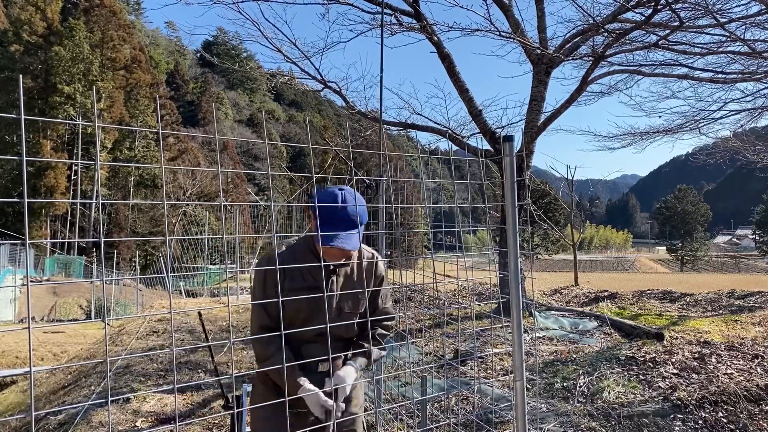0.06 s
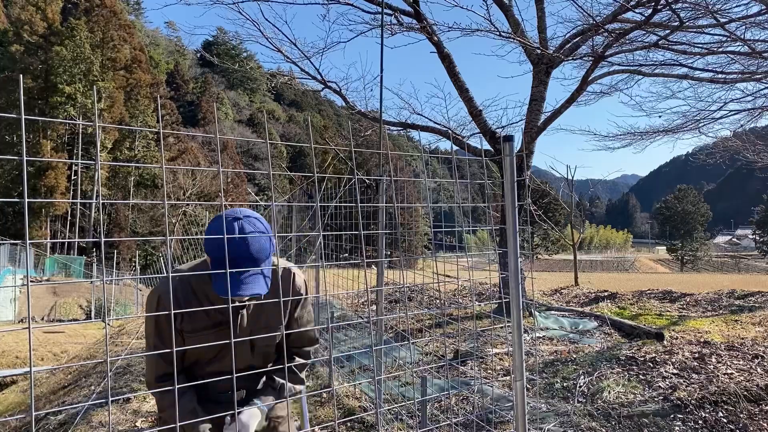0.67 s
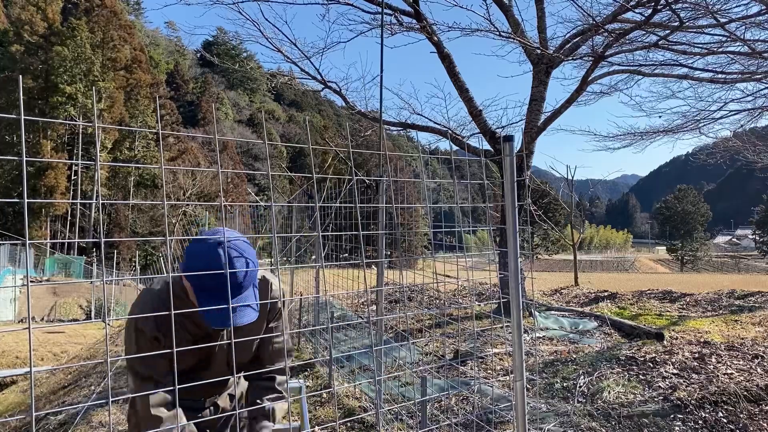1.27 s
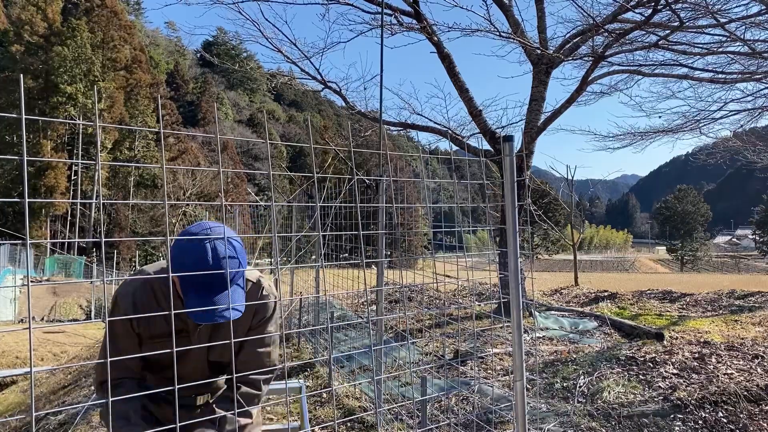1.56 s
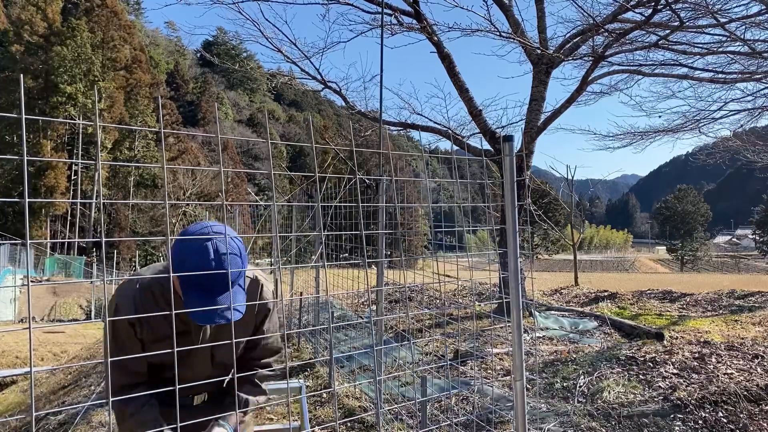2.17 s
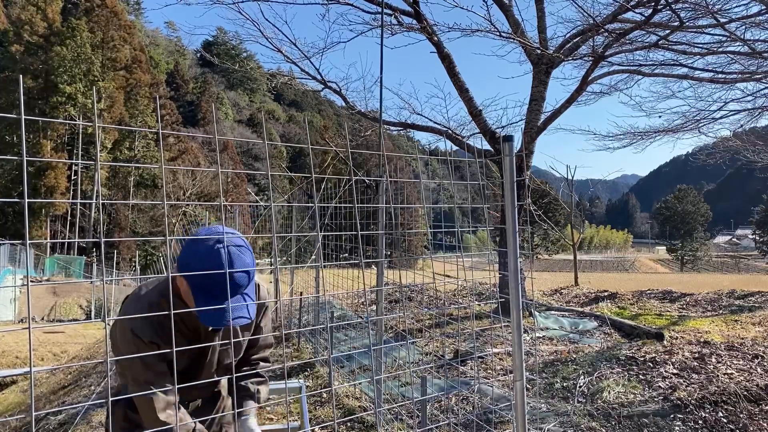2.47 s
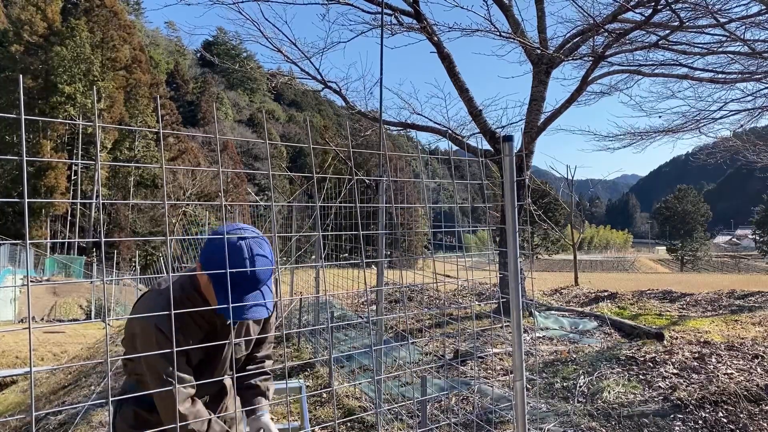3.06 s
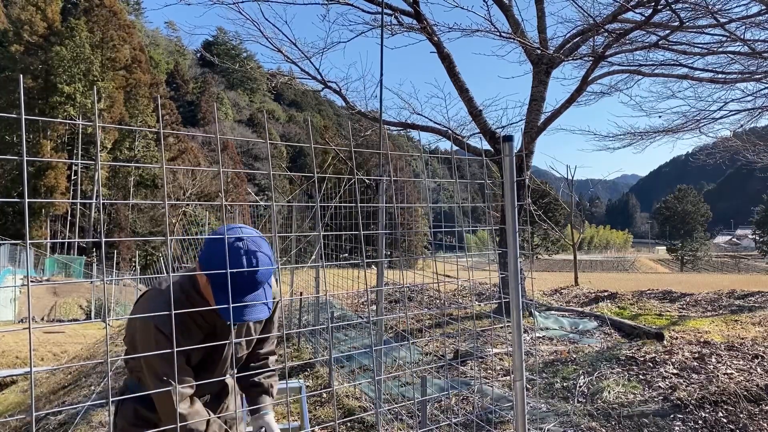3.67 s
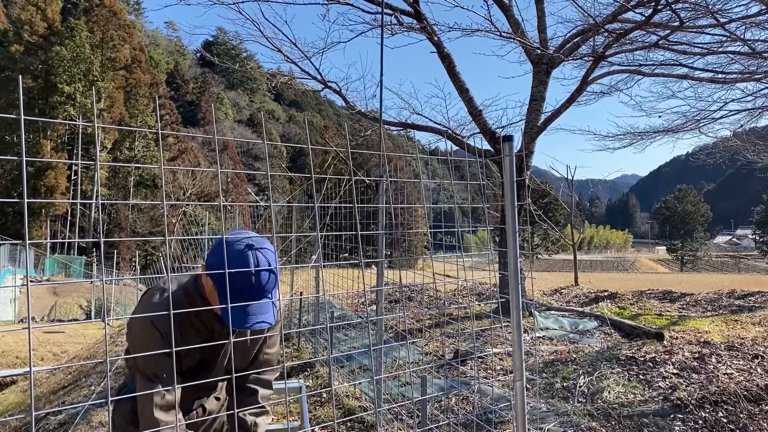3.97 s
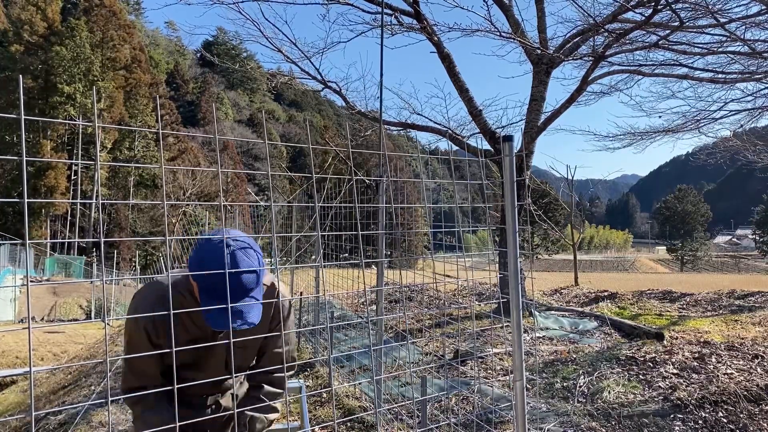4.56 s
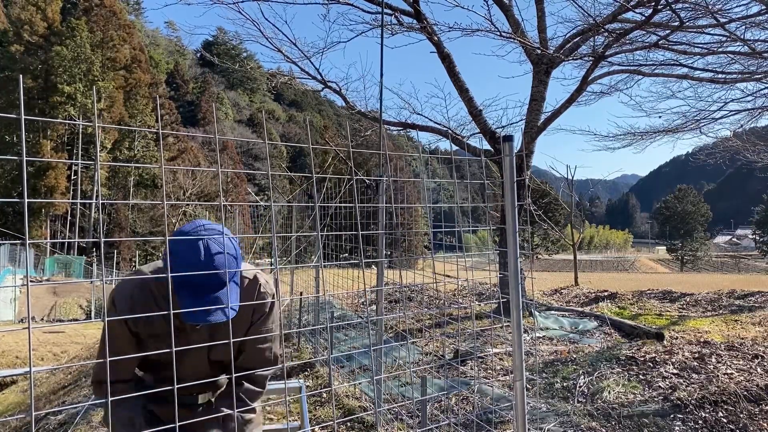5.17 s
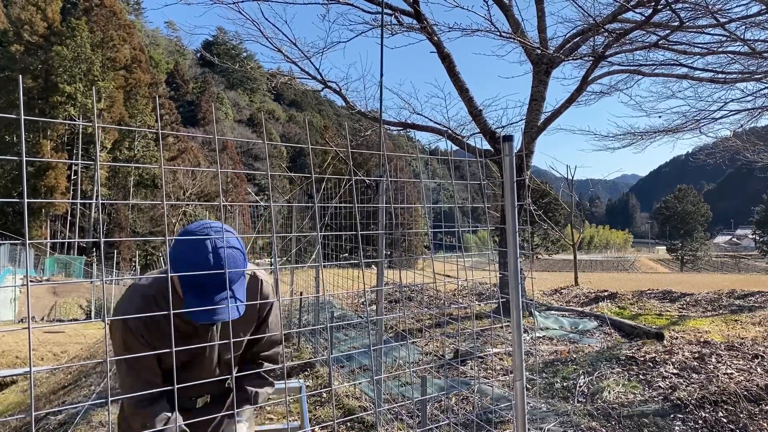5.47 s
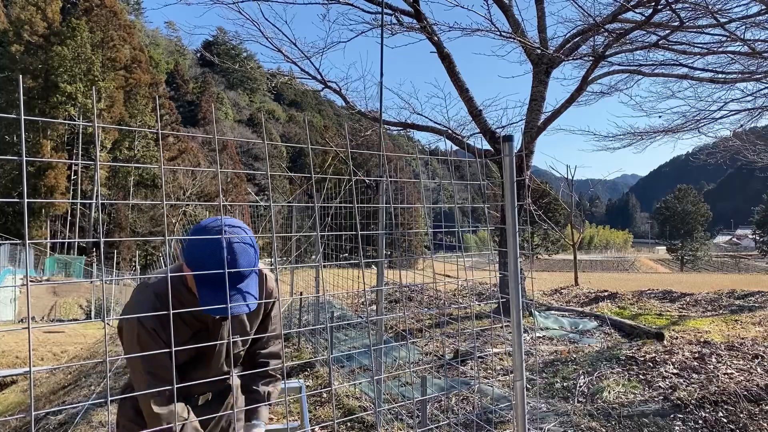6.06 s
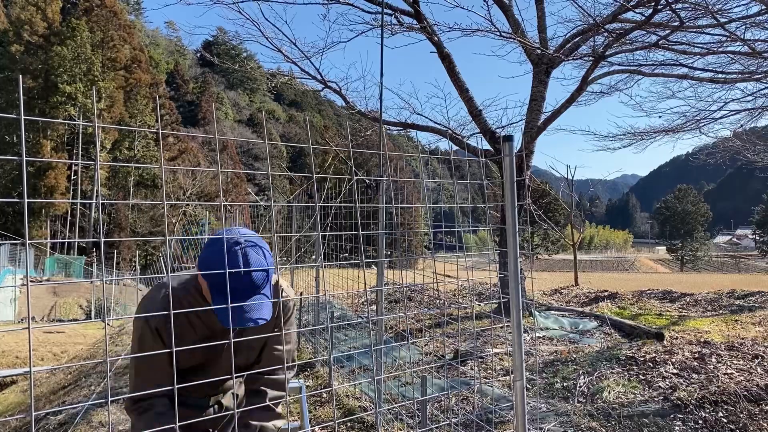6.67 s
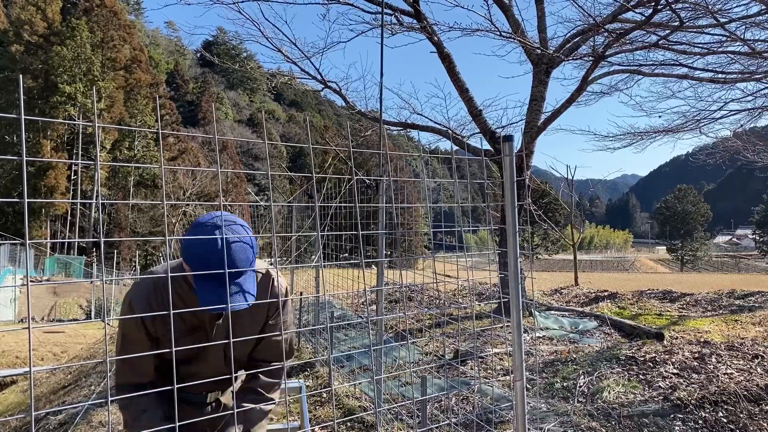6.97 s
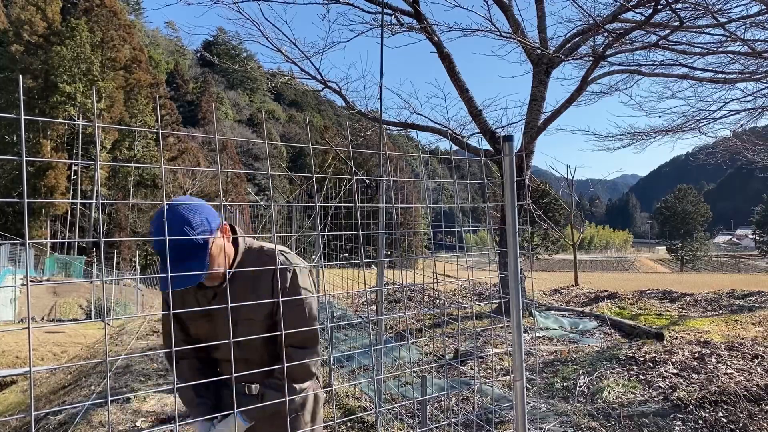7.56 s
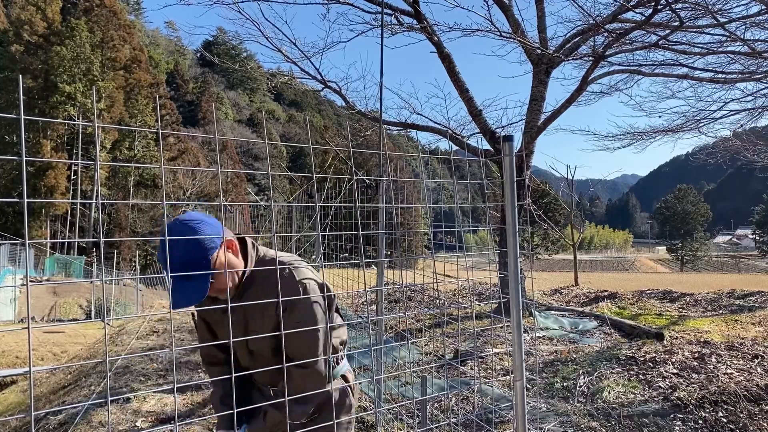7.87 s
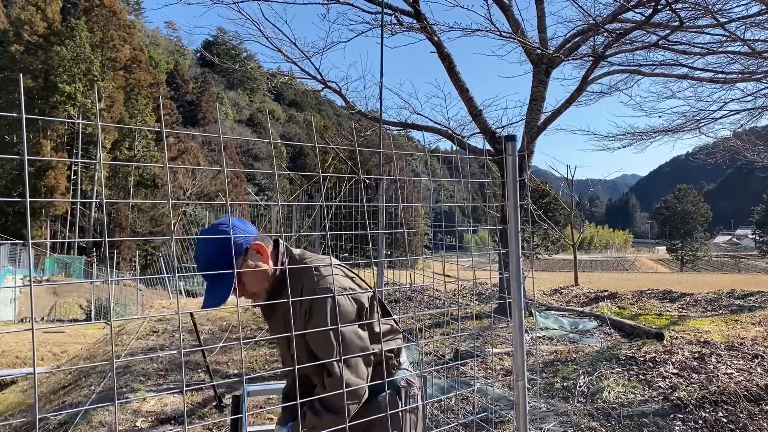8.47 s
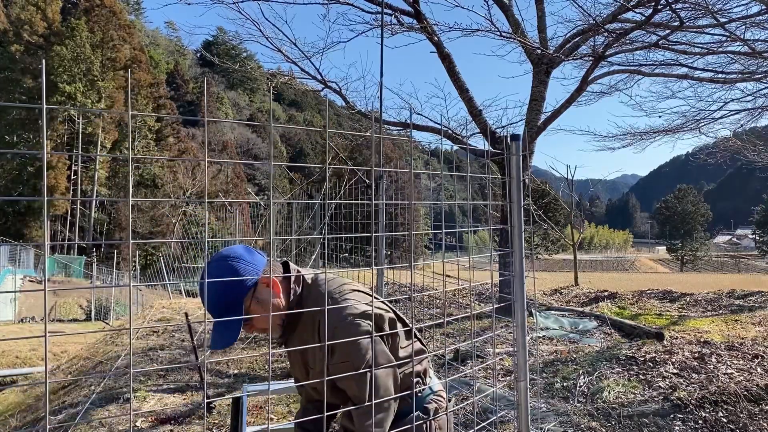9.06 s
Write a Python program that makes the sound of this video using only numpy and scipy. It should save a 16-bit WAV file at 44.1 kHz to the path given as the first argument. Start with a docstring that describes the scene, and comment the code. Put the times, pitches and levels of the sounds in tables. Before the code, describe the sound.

A quiet open valley, with light wind rumbling in small gusts on the microphone. During the first second, dry litter crackles and something rustles softly. Then a hammer strikes a steel stake eight times, close and loud, at about 1.3, 1.9, 2.7, 3.4, 4.0, 4.9, 5.8 and 6.8 seconds. Each blow is a sharp, slightly overloaded crack with a hollow knock and a high ping, followed by an echo from a slope. The wire fence rings faintly after each one and buzzes hardest at 1.3, 4.9 and 6.8 seconds. Between blows, wires tick lightly against a steel tube, with soft rubbing. From about 7.3 seconds the ticks grow busier, with a twig snap or two, then metal scrapes and clanks from 8 to 8.8 seconds, quieter than the hammering. The ringing fades away by about 9.3 seconds.

```python
"""Hammering a steel stake beside a wire fence

Each blow excites the stake's modes, leaves a high ping and overloads the microphones. Some blows
shake the mesh into a buzz, and a wooded slope across the open valley returns an echo. Between blows
the wires tick against a steel tube and dry litter crackles; at the end metal scrapes and clanks.
Light wind rumbles on the two microphone ports."""
import sys
import numpy as np
from scipy import signal
from scipy.fft import rfft, irfft, next_fast_len
from scipy.io import wavfile

SR = 44100
rng = np.random.default_rng(int(sys.argv[2]) if len(sys.argv) > 2 else 0)


def output_pcm(signal):
    """Save a mono or channel-first signal as 16-bit PCM at the path in sys.argv[1].

    Samples are clipped to [-1, 1] before scaling.
    """
    pcm = np.clip(np.atleast_2d(signal).T, -1, 1) * 32767
    wavfile.write(sys.argv[1], SR, np.round(pcm).astype(np.int16))


N = 410130
TIME = np.arange(N) / SR


def from_db(db):
    """Amplitude ratio of a level in decibels."""
    return 10 ** (np.asarray(db) / 20)


def unit_rms(x):
    """Normalisation to an rms of 1."""
    return x / np.sqrt(np.mean(x ** 2) + 1e-20)


def at_hz(points, hz):
    """Interpolation of a table on a logarithmic frequency axis."""
    frequencies, values = np.transpose(points)
    return np.interp(np.log(hz + 0.0013), np.log(frequencies), values)


def add(track, start_s, sound):
    """Superposition of a sound on a track from a given time."""
    i = max(round(start_s * SR), 0)
    track[..., i:i + sound.shape[-1]] += sound[..., :N - i]


def drift(per_s):
    """Random fluctuation of rms 1, linear between independent values."""
    return unit_rms(np.interp(TIME * per_s, np.arange(20000), rng.standard_normal(20000)))


def decay(t60, size=SR):
    """Exponential damping: 60 dB in t60 seconds."""
    return from_db(-60 * TIME[:size] / max(t60, 1e-4))


def band(x, low_hz, high_hz):
    """Butterworth band-pass with gentle skirts."""
    sos = signal.butter(2, [low_hz, min(high_hz, .45 * SR)], "band", fs=SR, output="sos")
    return signal.sosfilt(sos, x + 1e-18)


# Resonances of the fence wires: (frequency [Hz], bandwidth [Hz], gain [dB])
WIRE_RESONANCES = [(231, 26, 8), (818, 25, 6.5), (915, 70, 6.5), (1030, 70, 7), (2160, 40, 5),
                   (2940, 12, 6), (3560, 220, 4), (4300, 140, 3), (7100, 400, 4), (11050, 170, 6),
                   (12550, 15, 7)]
# Likeness of diffuse sound at the two ports: (frequency [Hz], coherence [1])
COHERENCE = [(50, 0.2), (250, 0.32), (700, 0.32), (1800, 0.033), (3500, 0.33), (5200, 0.052), (6700, .9),
             (7700, 0.24), (8500, 1), (9700, 0.97), (10500, 0.27), (11800, 0.84), (12900, 0.93),
             (14000, 0.63), (15500, 1)]


def noise(spectrum, wires=0, ripple_db=0, from_left=0, port_delay_s=.00026, direction_top_hz=6300):
    """A diffuse field plus a share that reaches the left port first; stereo, rms 1."""
    size = next_fast_len(N)
    hz = np.fft.rfftfreq(size, 1 / SR)
    peaks_db = sum(db / (1 + (2 * (hz - f) / width) ** 2) for f, width, db in WIRE_RESONANCES)
    ripple = np.interp(hz, np.linspace(0, SR / 2, 900), rng.standard_normal(900))   # many weak modes
    gain = from_db(at_hz(spectrum, hz) + wires * peaks_db + ripple_db * ripple)
    mid, side, far = rfft(rng.standard_normal((3, size))) * gain
    coherence = np.clip(at_hz(COHERENCE, hz), -1, 1)
    diffuse = np.sqrt(1 + coherence) * mid + np.sqrt(1 - coherence) * side * [[1], [-1]]
    lateral = np.array([far, far * np.exp(-2j * np.pi * hz * port_delay_s)])
    share = from_left * (hz < direction_top_hz)
    return unit_rms(irfft(np.sqrt(1 - share) * diffuse + np.sqrt(2 * share) * lateral)[:, :N])


def detuned(modes, spread):
    """A body hit on another spot: its modal frequencies shift a little."""
    return [(hz * (1 + spread * rng.normal()), db, t60) for hz, db, t60 in modes]


def struck(modes, spread_db, size=SR):
    """Free vibration: a sum of damped sinusoids, each of random strength and sign."""
    strengths = from_db(rng.normal(0, spread_db, len(modes))) * rng.choice([-1, 1], len(modes))
    return sum(strength * from_db(db) * decay(t60, size) * np.sin(2 * np.pi * hz * TIME[:size])
               for strength, (hz, db, t60) in zip(strengths, modes))


def driven(modes, force, spread_db):
    """Forced vibration: each mode is convolved with the force, at the energy of one clean blow."""
    out, size = 0, force.shape[1]
    for mode in modes:
        impulse_response = struck([mode], spread_db, size)
        response = signal.fftconvolve(force, impulse_response[None])[:, :size]
        out = out + unit_rms(response) * np.std(impulse_response)
    return out


# Hammer blows: (time [s], level [dB], relative ping [dB], relative knock [dB], bounce delay [s],
# relative bounce [dB], mesh shake [dB], lead of the graze [s])
BLOWS = [(1.2599, -10.5, -14.5, 6.5, .0055, -5, -10.5, 0.014),
         (1.8954, -8, -6.5, 6, 0.0062, 0.5, -23.5, 0.0016),
         (2.7191, -8.5, 1.5, 0, 0.0067, -7.5, -24.5, 0.003),
         (3.3754, -7, 1.5, -1.5, 0.0066, -2, -23.5, 0.00083),
         (4.0137, -6.5, -6.5, 2, .0075, -2.5, -22.5, .001), (4.891, -12, -8, 5.5, .009, -6, -10.5, 0.012),
         (5.839, -4.5, -3.5, 1, 0.0071, -2.5, -24, .001), (6.78, -6.5, -9.5, 0.5, 0.009, -4.5, -16, 0.0012)]
# Modes of stake and hammer, the hollow knock and the ping: (frequency [Hz], level [dB], T60 [s])
STAKE_MODES = [(705, -15, .018), (830, -20, .05), (1230, -7.5, .018), (1350, -11, .018), (1785, -1.5, .018),
               (1950, -6.5, .015), (2330, -6, .012), (2520, -3, .014), (2950, -13, .01),
               (3350, -10.5, .012), (4250, -14, .01), (4950, -14, .01), (6720, -1, .022), (7020, -3, .018),
               (7550, -4, .012), (7950, -2, .012), (8450, -3, .01), (8950, -7, .01), (11450, -7, .012),
               (14100, -8, .012)]
KNOCK_MODES = [(215, -20.5, .022), (273, -19.5, .02), (355, -13.5, 0.022), (445, -12, .018),
               (537, -17.5, 0.018)]
PING_MODES = [(6682, -4, .16), (6991, -9, .085), (6690, -25, .4), (12450, -26, .1)]


def hammer(contact_s=.0039, last_touch_db=-16, chatter_db=-24.5, crack_db=-5, fizz_db=-11.5):
    """Impact excitation: the head lands and bounces twice; each contact cracks and rings the steel."""
    out, size = np.zeros((2, N)), SR // 3
    pulse = np.exp(-(TIME[:size] / contact_s) ** 4)
    pan_db = np.array([[1], [-1]])
    for s, db, ping_db, knock_db, bounce_s, bounce_db, *_ in BLOWS:
        taps = np.zeros(size)
        landings = [0, round(bounce_s * SR), round(1.7 * bounce_s * SR)]
        taps[landings] = from_db([0, bounce_db, bounce_db + last_touch_db])
        contact = signal.fftconvolve(taps, pulse)[:size]
        grit = rng.standard_normal(size) + .42 * rng.standard_normal((2, size))   # centre plus width
        force = taps + from_db(chatter_db) * contact * grit
        knock = from_db(knock_db + pan_db) * driven(KNOCK_MODES, force, spread_db=1)
        body = from_db(6) * (driven(STAKE_MODES, force, spread_db=.5) + knock)
        ping = from_db(ping_db) * struck(detuned(PING_MODES, .002), .58, size)
        crack = from_db(crack_db) * band(grit * contact, 250, 16000)
        fizz = from_db(fizz_db) * band(grit * decay(.07, size), 5500, 21000)
        add(out, s, from_db(db) * (body + ping + crack + fizz))
    # the blows carry little below about 200 Hz
    return signal.sosfilt(signal.butter(4, 195, "high", fs=SR, output="sos"), out + 1e-18)


# Tugs on the mesh by hand: (time [s], level [dB], T60 [s])
TUGS = [(2.597, -42, 1), (3.232, -44.5, 0.66), (3.905, -47, 1), (6.218, -44.5, 0.99), (7.886, -36.5, 1),
        (8.597, -31, 0.27), (8.762, -40, 0.26)]
# Spectrum of the buzz: (frequency [Hz], spectral level [dB])
MESH_SPECTRUM = [(100, -12), (220, -6), (400, -9), (950, -0.5), (1400, -2.5), (2000, -0.5), (3400, -2.5),
                 (5800, -3), (7400, 1), (9000, -1.5), (12000, -3), (13400, -1), (14400, -7.5),
                 (15500, -18.5)]


def mesh(buzz_db=-7.5, shake_t60=.93, burst_t60=.17, jangle_db=-14, jangle_t60=1.9):
    """Contact rattle: wire crossings buzz together, hard at first; the lower modes jangle on."""
    shaking, jangling, size = np.zeros(N), np.zeros(N), 2 * SR
    shakes = [(s, shake_db, shake_t60) for s, *_, shake_db, lead_s in BLOWS]
    for s, db, t60 in shakes + list(TUGS):
        add(shaking, s, from_db(db) * (from_db(buzz_db) * decay(t60, size) + decay(burst_t60, size)))
        add(jangling, s, from_db(db + jangle_db) * decay(jangle_t60, size))
    buzz = noise(MESH_SPECTRUM, wires=.15, ripple_db=3.5, from_left=.51)
    roughness = from_db(.5 * drift(900) + .6 * drift(80))
    jangle = band(noise(SLOPE_SPECTRUM, wires=1, ripple_db=2.5, from_left=.65), 150, 4200)
    return buzz * roughness * shaking + jangle * jangling


def graze(rise_s=.0018):
    """Sliding contact: the head brushes the mesh just before it lands, in a thin bright rasp."""
    envelope = np.zeros(N)
    for s, *_, shake_db, lead_s in BLOWS:
        envelope += from_db(shake_db) * np.clip((TIME - s + lead_s) / rise_s, 0, 1) * (TIME < s)
    return band(noise(MESH_SPECTRUM), 2800, 15000) * envelope


# Notes of single wires: (frequency [Hz], level [dB], T60 [s])
WIRE_MODES = [(231, -56.5, 2.4), (818, -54, 2), (912, -56, 1.7), (1028, -56, 1.8), (1058, -54, 1.8),
              (1712, -59, 1.5), (2164, -56, 1.6), (2686, -60, 1.3), (2939, -51, 1.7), (3445, -58, 1.2),
              (3601, -54, 1.5), (3715, -57, 1.3), (3950, -60, 1.2), (4285, -59, 1.2)]


def singing_wires(sing_db=2, db_per_shake_db=.35, split=.0016, twin_db=-6):
    """Beats: after a blow each wire swings in two planes at slightly different frequencies."""
    out = np.zeros((2, N))
    mean_db = np.mean([shake_db for *_, shake_db, lead_s in BLOWS])
    twins = [(hz * (1 + split), db + twin_db, t60) for hz, db, t60 in WIRE_MODES]
    for s, *_, shake_db, lead_s in BLOWS:
        first_plane = struck(WIRE_MODES, 1.1, 2 * SR)
        second_plane = np.array([struck(twins, 1.7, 2 * SR) for port in range(2)])
        gain = from_db(sing_db + db_per_shake_db * (shake_db - mean_db))
        add(out, s, gain * (first_plane + second_plane))
    return out


# Swings of the mesh, about 0.2 s after a blow: (time [s], level [dB], level of second swing [dB])
REBOUNDS = [(1.4653, -8.5, -21.5), (2.0898, -18, -56), (2.9204, -16.5, -22.5), (3.5818, -17.5, -50),
            (4.2198, -13, -22.5), (5.084, -11, -21.5), (6.9897, -14.5, -27.5)]


def rebounds(second_swing_s=.1075, body_db=8, stray_loss_db=12.5, stray_body_db=-8):
    """Damped swinging: the mesh meets the tube twice, with two stray touches; rows as in TICKS."""
    touches = []
    for s, db, second_db in REBOUNDS:
        touches += [(s, db, body_db), (s + second_swing_s, second_db, body_db)]
        for late_s in rng.uniform(.0092, .29, 2):
            touches.append((s + late_s, db - stray_loss_db, stray_body_db))
    return touches


# Wires pushed against the tube: (time [s], level [dB], relative level of the tube's modes [dB])
TICKS = [(2.2822, -32, 15), (3.7389, -23.5, 9), (4.4054, -22.5, 12), (4.4917, -32, -3), (4.5541, -28, -14),
         (4.8357, -32.5, -13), (5.405, -24.5, -10), (5.5248, -34, 15), (5.6238, -23.5, 9), (5.972, -25, 2),
         (6.109, -28.5, -10), (6.2607, -24.5, 1), (6.33, -29.5, 10), (6.3904, -29.5, -11), (6.4872, -24, 5),
         (7.365, -26.5, 5), (7.4288, -26.5, 8.5), (7.5695, -30, 12), (7.708, -34.5, 13.5),
         (7.8156, -37, 14), (7.948, -26, 6), (7.977, -18, 4), (8.087, -16, 10), (8.1165, -26.5, 16),
         (8.1733, -21, 14), (8.2619, -17.5, 10.5), (8.36, -30.5, 14.5), (8.408, -33, 5), (8.44, -42, 11),
         (8.596, -14.5, 6), (8.625, -15.5, 10), (8.7216, -21.5, 11), (8.762, -11, 5)]
# Modes of the steel tube and wires: (frequency [Hz], level [dB], T60 [s])
TUBE_MODES = [(630, -27, 0.41), (1016, -29.5, 0.7), (1780, -14.5, 0.046), (1910, -17, 0.029),
              (2140, -12.5, 0.023), (2900, -29.5, 0.14), (3730, -22, 0.063), (6130, -14.5, 0.03),
              (6495, -14.5, 0.032), (7320, -15.5, 0.041), (12600, -20.5, 0.059), (14000, -7.5, 0.043)]
# Spectrum of clicks and rubbing: (frequency [Hz], spectral level [dB])
CONTACT_SPECTRUM = [(150, -10), (400, -1), (1000, -0.5), (2100, 0), (3000, -2.5), (5200, -5), (7200, -3.5),
                    (11000, -7), (13500, -8), (15500, -10)]


def ticks(click_db=-26.5, tail_db=-14.5, ring_db=-13.5, zing_db=-15.5):
    """Impact and dispersion: a wire clicks and rings the tube; a zing falls as slower waves arrive."""
    envelope, ringing, size = np.zeros(N), np.zeros(N), SR // 3
    zing_hz = 13250 + 2400 * np.exp(-TIME[:size] / .0035)
    zing = (decay(.03, size) + .2 * decay(.3, size)) * np.sin(2 * np.pi * np.cumsum(zing_hz) / SR)
    click = from_db(click_db) * decay(.022, size) + from_db(tail_db) * decay(.22, size)
    for s, db, body_db in list(TICKS) + rebounds():
        add(envelope, s, from_db(db) * click)
        touch_db = rng.normal(0, 2)   # every touch lands on another spot
        tube = from_db(ring_db + body_db) * struck(detuned(TUBE_MODES, .05), 3.4, size)
        add(ringing, s, from_db(db) * (tube + from_db(zing_db + touch_db) * zing))
    return noise(CONTACT_SPECTRUM, wires=.11, ripple_db=5) * envelope + ringing


# Knocks on a loose steel piece: (time [s], level [dB], relative level of the low modes [dB])
CLANKS = [(8.087, -53, 7), (8.262, -50, 9), (8.625, -41, 1), (8.762, -38.5, -3)]
# Modes of that piece: (frequency [Hz], level [dB], T60 [s])
LOOSE_STEEL_MODES = [(802, -15, .9), (1028, -6, .6), (1046, -12, .5), (2062, -11, .45), (2191, -14, .6),
                     (2934, -4, .35), (3709, -18, .2), (5593, 0, .45), (5607, -7, .35), (13330, -15, .35)]


def clanks(low_below_hz=3000):
    """Free vibration: a loose steel piece is left ringing in its inharmonic modes."""
    out = np.zeros(N)
    for s, db, low_db in CLANKS:
        modes = [(hz, mode_db + low_db * (hz < low_below_hz), t60)
                 for hz, mode_db, t60 in LOOSE_STEEL_MODES]
        add(out, s, from_db(db) * struck(modes, spread_db=.36))
    return out


# Spectrum of the echo, shared by the mesh's jangle: (frequency [Hz], spectral level [dB])
SLOPE_SPECTRUM = [(100, -32.5), (220, -8.5), (430, -1), (850, -0.5), (1400, -2.5), (2200, 0.5),
                  (4000, -2.5), (5200, -2.5), (7000, -0.5), (9500, -1), (13000, -14), (15500, -18)]
# Reverberation time of the slope: (frequency [Hz], T60 [s])
SLOPE_T60 = [(200, 2.6), (900, 1.95), (2500, 1.01), (7000, 0.6), (14000, 0.97)]


def slope_echo(echo_db=-31.5, delay_s=.15, near_db=-19.5, rise_s=.0063, flutter_db=3):
    """Scattering: near ground answers first, then the wooded slope on the left; bass lasts longest."""
    out, age = np.zeros((2, N)), TIME[:2 * SR]
    scatter = noise(SLOPE_SPECTRUM, wires=.8, ripple_db=2.5, from_left=.6)
    near = from_db(near_db) * (age < delay_s) * np.minimum(age / rise_s, 1)
    far = np.exp(-(np.minimum(age - delay_s, 0) / rise_s) ** 2)
    edges_hz = np.geomspace(100, 18000, 8)
    for low, high in zip(edges_hz, edges_hz[1:]):
        t60 = at_hz(SLOPE_T60, np.sqrt(low * high))
        tail = np.maximum(near, far) * from_db(-60 * np.maximum(age - delay_s, 0) / t60)
        envelope = np.zeros(N)
        for s, *_ in BLOWS:
            add(envelope, s, tail)
        out += band(scatter, low, high) * envelope
    return from_db(echo_db + flutter_db * drift(40)) * out


def ping_echo(echo_db=-37.5, t60=.8, width_hz=45):
    """Narrow-band reverberation: scattered by the trees, the ping lingers as a wavering whistle."""
    envelope, hz = np.zeros(N), PING_MODES[0][0]
    for s, db, ping_db, *_ in BLOWS:
        add(envelope, s, from_db(db + ping_db + echo_db) * decay(t60))
    return envelope * unit_rms(band(rng.standard_normal(N), hz - width_hz / 2, hz + width_hz / 2))


def ground_thud(thud_db=-39.5, t60=.12):
    """Ground-borne vibration: each blow sends a soft thud through the soil."""
    envelope = np.zeros(N)
    for s, *_ in BLOWS:
        add(envelope, s, from_db(thud_db) * decay(t60))
    return envelope * unit_rms(band(rng.standard_normal(N), 60, 190))


# Strokes of metal, cloth and dry grass: (time of peak [s], level [dB], swell time [s])
RUBS = [(.05, -62, 0.21), (.235, -55, 0.28), (.49, -56.5, 0.11), (.62, -54, 0.18), (.71, -50, 0.14),
        (.775, -48.5, 0.063), (0.941, -43, 0.031), (1.781, -41.5, 0.21), (2.39, -44.5, 0.15),
        (4.55, -50.5, 0.34), (5.58, -44, 0.99), (7.34, -49, 0.5), (7.941, -34, 0.069), (8.221, -45.5, 1),
        (8.75, -43, 0.34), (9.3, -53, 0.13)]


def rubbing(swell_db=21.5, release_share=.87, rustle_db=-73):
    """Friction: grainy noise swells and fades with each stroke, over a faint rustle."""
    envelope = from_db(rustle_db)
    for s, db, swell_s in RUBS:
        from_peak = np.maximum(s - TIME, (TIME - s) / release_share) / swell_s
        envelope = np.maximum(envelope, from_db(db - swell_db * from_peak) * (from_peak < 2))
    friction = noise(CONTACT_SPECTRUM, wires=.8, ripple_db=2.5)
    grain = from_db(2.5 * drift(350) + 2.5 * drift(60))
    return friction * envelope * grain


# Snaps in the dry litter: (time [s], level [dB], T60 [s])
TWIGS = [(.049, -40, .012), (.126, -45, .014), (.452, -46.5, 0.11), (.58, -44, .02), (.619, -39, .015),
         (.631, -39, .018), (.655, -48, 0.1), (.698, -31, .018), (1.075, -41, .012), (7.548, -37, .03),
         (7.925, -38, .2)]


def twigs(gain_db=11):
    """Brittle fracture: dry litter snaps underfoot in short, dull bursts of noise."""
    snaps = np.zeros(N)
    for s, db, t60 in TWIGS:
        add(snaps, s, from_db(db + gain_db) * decay(t60) * rng.standard_normal(SR))
    return band(snaps, 510, 1290)


# Light breeze on the ports: (time [s], level [dB])
BREEZE = [(0, -58), (.2, -59), (.9, -59), (1.9, -45.5), (2.5, -47), (2.85, -52), (4.3, -47.5), (5.1, -45),
          (6.1, -50.5), (7.7, -51), (8.7, -48), (9.1, -62), (9.3, -57.5)]
# Bell-shaped gusts: (time of peak [s], level [dB], standard deviation [s])
GUSTS = [(0.297, -41.5, 0.032), (0.404, -34.5, 0.032), (0.506, -40.5, 0.071), (0.616, -40.5, 0.019),
         (0.73, -43, 0.061), (1.082, -40, 0.063), (1.16, -39, 0.1), (1.333, -38, 0.033),
         (1.435, -33, 0.016), (1.745, -41, 0.037), (1.98, -41, 0.42), (2.127, -28.5, 0.041),
         (3.097, -41, 0.031), (3.79, -38, 0.098), (3.991, -29.5, 0.011), (4.49, -42.5, 0.1),
         (4.625, -42, 0.048), (4.767, -41, 0.16), (8.201, -43, 0.025), (8.456, -42, 0.069)]
# Spectrum of the wind's rumble: (frequency [Hz], spectral level [dB])
WIND_SPECTRUM = [(15, -8.5), (35, -2.5), (60, 7), (100, 0), (170, -12), (300, -26.5), (600, -35),
                 (2000, -69)]


def wind(rumble_db=1, lumps_db=3.2, eddy_db=-8, eddy_growth=1.47, reference_db=-41):
    """Turbulence: a lumpy rumble on the ports, with smaller eddies gaining in strong gusts."""
    breeze = from_db(np.interp(TIME, *np.transpose(BREEZE)))
    gusts = [from_db(db) * np.exp(-((TIME - s) / sigma_s) ** 2 / 2) for s, db, sigma_s in GUSTS]
    level_db = 20 * np.log10(np.maximum(breeze, np.max(gusts, axis=0))) + lumps_db * drift(18)
    eddy_gain = from_db(reference_db + eddy_db + eddy_growth * (level_db - reference_db))
    eddies = eddy_gain * unit_rms(band(noise(WIND_SPECTRUM), 160, 380))
    rumble = band(from_db(level_db + rumble_db) * noise(WIND_SPECTRUM), 34, 4000)
    return rumble + eddies


# Spectrum of the valley's hush: (frequency [Hz], spectral level [dB])
AIR_SPECTRUM = [(25, -1.5), (70, 1.5), (200, 0), (400, -4.5), (900, -9), (2000, -11), (5000, -26),
                (8000, -25.5), (13000, -28.5), (15500, -26.5)]


def valley_air(level_db=-55.5):
    """Diffuse ambient noise: the steady hush of the open valley."""
    return from_db(level_db) * noise(AIR_SPECTRUM)


def scene():
    """Superposition of all sources at the two ports."""
    blows = graze() + hammer() + ping_echo() + mesh() + singing_wires() + slope_echo()
    handling = ticks() + clanks() + twigs() + rubbing()
    return blows + handling + wind() + valley_air() + ground_thud()


def limiter(x, ceiling_db=13.5, release_db_per_s=297, attack_s=.00076):
    """Peak limiting: the gain dives under a peak and recovers within tens of milliseconds."""
    over_db = np.maximum(20 * np.log10(np.abs(x).max(axis=0) + 1e-9) - ceiling_db, 0)
    held_db = np.maximum.accumulate(over_db + release_db_per_s * TIME) - release_db_per_s * TIME
    pole = np.exp(-1 / (attack_s * SR))
    return x * from_db(-signal.lfilter([1 - pole], [1, -pole], held_db))


# Lag of the right port behind the left: (frequency [Hz], phase [rad])
PORT_LAG = [(0, 0), (6750, 0), (8450, 3.14), (9850, 3.14), (10700, 5.1), (11700, 6.28), (12900, 6.28),
            (14700, 9.42)]


def record(dry, cutoff_hz=15700):
    """Phase shift and saturation: the right treble lags, blows are limited and clip, the top is cut."""
    size = next_fast_len(N + 2000)
    lag = np.interp(np.fft.rfftfreq(size, 1 / SR), *np.transpose(PORT_LAG))
    right = irfft(rfft(dry[1], size) * np.exp(-1j * lag), size)[:N]
    limited = limiter(np.array([dry[0], right]))
    clipped = limited / (1 + limited ** 8) ** .125
    return signal.sosfilt(signal.ellip(10, .2, 70, cutoff_hz, fs=SR, output="sos"), clipped)


dry = scene()
out = record(dry)
output_pcm(out)
```